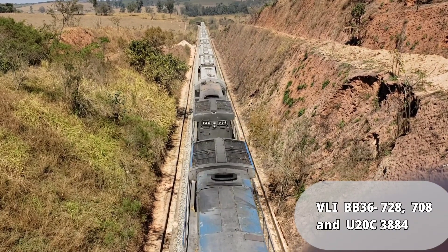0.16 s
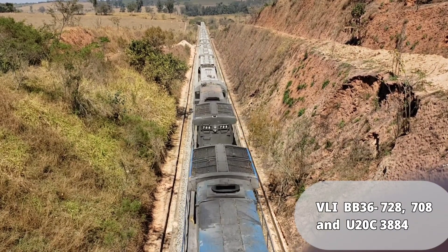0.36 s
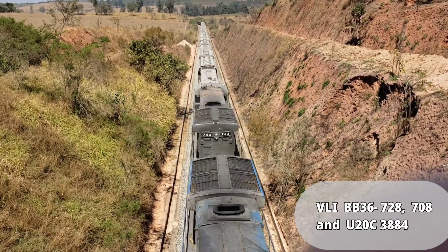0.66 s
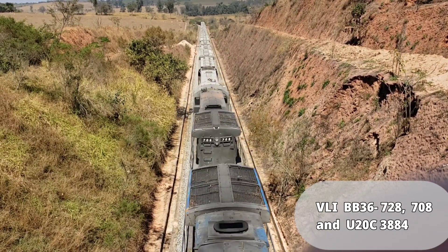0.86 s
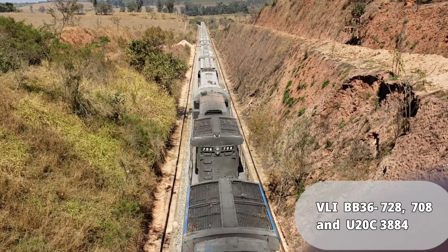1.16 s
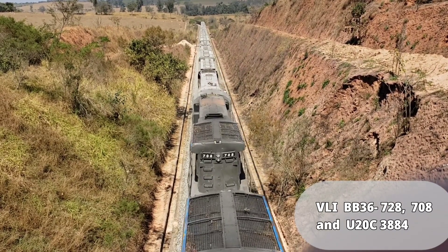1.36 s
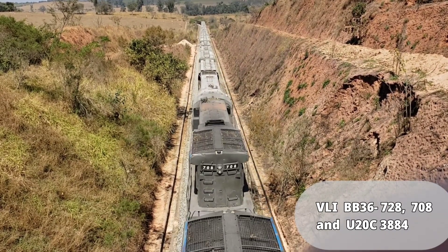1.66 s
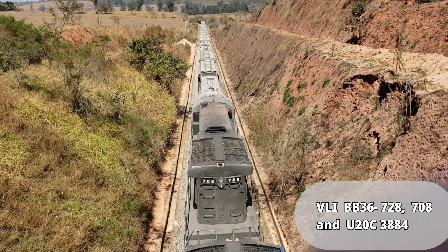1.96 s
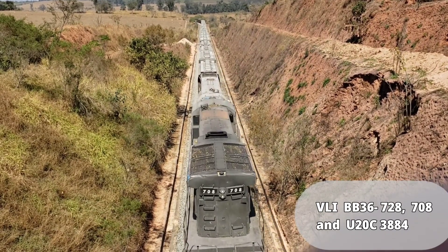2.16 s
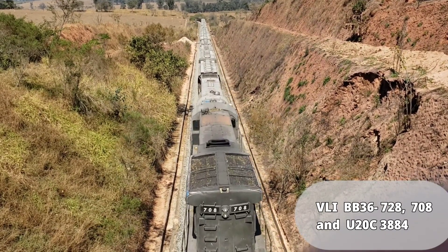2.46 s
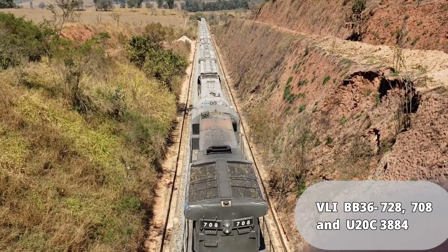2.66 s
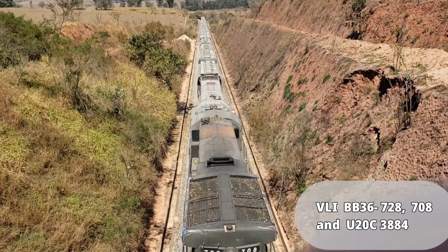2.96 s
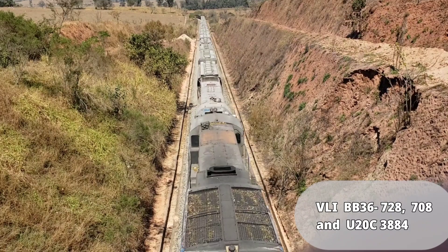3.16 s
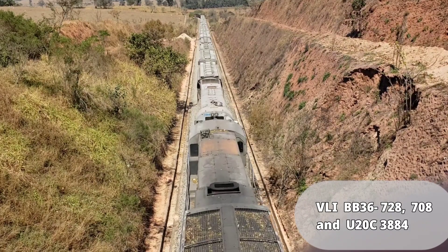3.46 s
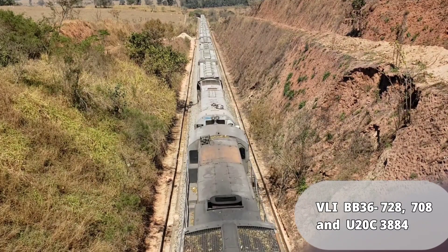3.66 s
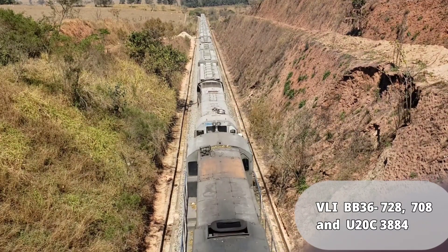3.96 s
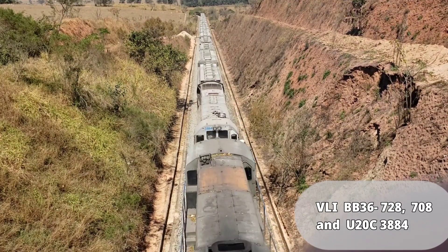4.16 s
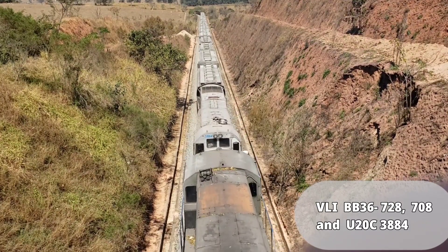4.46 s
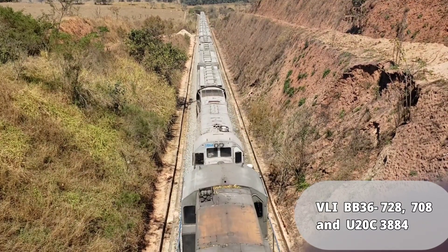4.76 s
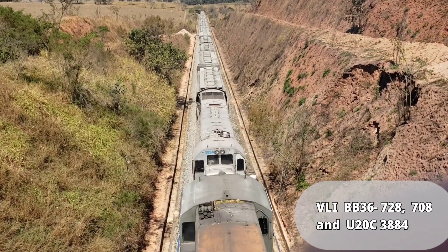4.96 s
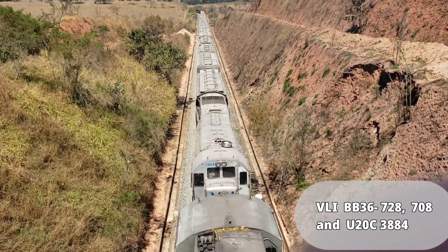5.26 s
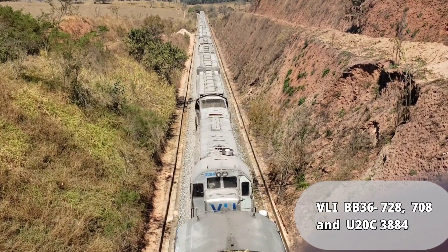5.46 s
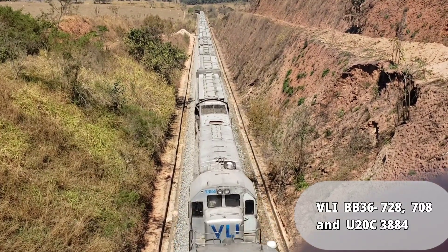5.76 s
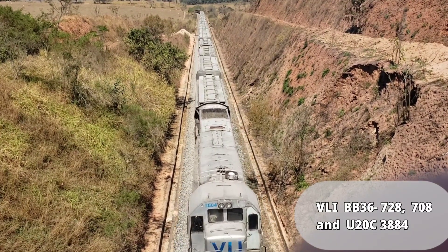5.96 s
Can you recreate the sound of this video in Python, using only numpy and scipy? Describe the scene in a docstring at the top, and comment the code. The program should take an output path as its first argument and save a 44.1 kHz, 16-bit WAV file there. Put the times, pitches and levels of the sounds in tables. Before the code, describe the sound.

Slow diesel locomotives pass close beneath, roaring exhaust hiss and heavy throbbing boom, then dropping to muffled engine drone, rolling rumble and faint rail squeals.

```python
"""Two diesel locomotives roll slowly under a bridge in a cutting, heard from above by a close pair of microphones.
First the near stack roars and puffs in bands of noise over the boom of the exhaust, itself firing harmonics
shaped by pipe resonances, with a whine from the traction gears. From about two seconds the deck hides the
stack and its hiss falls away; then the following engine's boom swells. From about four seconds wheels and
rails take over: shaped noise rumbles and hums, and narrow resonances sing briefly."""
import sys
import numpy as np
from scipy import signal
from scipy.fft import rfft, irfft
from scipy.io import wavfile
from scipy.ndimage import map_coordinates

SR = 44100
rng = np.random.default_rng(int(sys.argv[2]) if len(sys.argv) > 2 else 0)


def how_loud(loudness_db):
    """Turn decibels into a plain amplitude multiplier (0 dB gives 1, 20 dB gives 10)."""
    steps = np.asarray(loudness_db, float) / 20
    return 10 ** steps


def transcribe(u):
    """Save the signal u as a 16-bit wav file named by the first command-line argument.

    u: samples, shape (n,) or (channels, n), limited to [-1, 1]; the rate is SR.
    q: integer samples, one column per channel.
    """
    v = np.clip(np.atleast_2d(u).T, -1, 1)
    q = np.round(v * 32767).astype(np.int16)
    wavfile.write(sys.argv[1], SR, q)


N = 269010  # samples


def rms_one(x):
    """Scales a sound to rms 1."""
    return x / np.sqrt(np.mean(x ** 2) + 1e-20)


def in_time(rows):
    """Reads each column of a table as one value per sample."""
    s, *columns = np.transpose(rows)
    return [np.interp(np.arange(N) / SR, s, column) for column in columns]


def at_hz(points, hz):
    """Reads a spectrum table on a logarithmic frequency axis."""
    table_hz, values = np.array(points).T
    return np.interp(np.log(hz), np.log(table_hz), values)


def cut(x, hz, kind, order=2):
    """Butterworth filter run forwards."""
    return signal.sosfilt(signal.butter(order, hz, kind, fs=SR, output="sos"), x)


def cut_in_phase(x, hz, kind):
    """Gentle Butterworth filter run both ways, so that it adds no delay."""
    return signal.sosfiltfilt(signal.butter(1, hz, kind, fs=SR, output="sos"), x)


def drift(rate_hz):
    """Random wandering of spread 1: noise through two equal low-pass poles at rate_hz."""
    step = 40  # samples between the values drawn
    r = np.exp(-2 * np.pi * rate_hz * step / SR)
    noise = rng.standard_normal(N // step + 2002)
    slow = signal.lfilter([1], [1, -2 * r, r * r], noise)[2000:]
    return np.interp(np.arange(N) / step, np.arange(len(slow)), rms_one(slow - slow.mean()))


def late(x, ms):
    """Reads a sound with a changing delay."""
    return map_coordinates(x, [np.arange(N) - ms * SR / 1000], order=3, mode="mirror")


def resonances(x, modes):
    """Parallel ringing modes with alternating signs."""
    out = 0
    for k, (hz, width_hz, db) in enumerate(modes):
        r = np.exp(-np.pi * width_hz / SR)
        w = 2 * np.pi * hz / SR
        ring = signal.lfilter([0, np.sin(w)], [1, -2 * r * np.cos(w), r * r], x)
        out = out + (-1) ** k * how_loud(db) * ring
    return out


def coloured(spectrum, count):
    """Frequencies, and the transforms of unrelated noises shaped by a spectrum."""
    hz = np.maximum(np.fft.rfftfreq(N, 1 / SR), 1)
    return hz, rfft(rng.standard_normal((count, N))) * how_loud(at_hz(spectrum, hz))


# near engine: (time [s], order 11 level [dB], order 12 level [dB], order 13 level [dB],
# bark swing [dB], delay of a second arrival of the lower orders, which shapes the throb [ms])
NEAR_ENGINE = [(0, -27, -18, -19.5, -0.5, 54), (.5, -21, -19, -22, -0.5, 57), (1, -27, -23, -18.5, 1, 57),
               (1.3, -31, -23, -13.5, -2, 55.5), (1.55, -22, -22.5, -17, 0.5, 55.7),
               (2, -24, -22.5, -16, -3.5, 55), (2.5, -16, -22.5, -17, -4, 55.5),
               (3, -19, -19.5, -17, -13, 55.3), (3.25, -20, -24, -17.5, -15, 55.3),
               (3.5, -32, -20, -42, -9, 54.7), (3.75, -58, -22.5, -30.5, -14.5, 54.7),
               (4, -32, -33, -21, -14, 54.7), (4.3, -28, -26.5, -26, -16, 55.8),
               (4.75, -21.5, -55, -24, -18.5, 56.5), (5, -35, -22.5, -30, -17, 58),
               (5.25, -22.5, -20, -15.5, -12, 57), (5.5, -23, -19.5, -22, -15.5, 46),
               (5.75, -20, -50, -20.5, -18.5, 56.3), (6.1, -21, -23, -31, -10.5, 56)]
# orders of the engine cycle that sound together: (first [order], last [order]); the first three are the boom
ORDER_GROUPS = [(11, 11), (12, 12), (13, 13), (5, 7), (8, 10), (14, 15), (16, 18), (19, 23), (24, 26),
                (27, 29), (30, 44)]
# each group beside the boom: (level [dB], share of the bark's swing [ratio])
BARK_VOICING = [(-37, 0.091), (-31.5, 0.27), (-23, 0.59), (-24.5, 0.98), (-22, 1.16), (-35, 1.05),
                (-35.5, 0.96), (-33.5, 1.03)]
# following engine: (time [s], level [dB])
FOLLOWING_ENGINE = [(2.5, -64), (3.7, -42), (4.4, -30), (5.2, -29.5), (6.1, -32)]


def exhausts(near_hz, far_hz):
    """Exhaust boom and bark of both engines; the near one's lower orders arrive twice, shaping the throb."""
    second_share = 0.26
    near = orders(near_hz, start=0, waver_db=1.0)
    far = orders(far_hz, start=.3, waver_db=3.5)
    *boom_db, bark_db, second_ms = in_time(NEAR_ENGINE)
    groups = [rms_one(near[first:last + 1].sum(0)) for first, last in ORDER_GROUPS]
    groups.append(rms_one(far[5:].sum(0)))
    voiced_db = [db + swing * bark_db for db, swing in BARK_VOICING]
    levels = boom_db + voiced_db + in_time(FOLLOWING_ENGINE)
    parts = [how_loud(db) * signal.resample_poly(group, 20, 1)[:N] for db, group in zip(levels, groups)]
    lower_orders = sum(parts[:5])
    return sum(parts) + second_share * late(lower_orders, second_ms)


# cylinder firings in one engine cycle: (position [share of the cycle], relative strength [dB])
CYLINDER_FIRINGS = [(0.047, 4.5), (0.098, 7.9), (0.135, -1.2), (0.236, -12.0), (0.281, 9.2), (0.344, 9.8),
                    (0.413, 8.4), (0.472, -1.4), (0.585, 2.7), (0.604, -3.1), (0.669, 3.5), (0.741, 10.7),
                    (0.794, 2.5), (0.809, -0.4), (0.934, 3.7), (0.986, 4.4)]
# resonances of exhaust pipe and silencer: (frequency [Hz], width [Hz], relative gain [dB])
EXHAUST_PIPE = [(85.0, 15.0, -6.7), (95.0, 17.8, -5.9), (128.4, 12.0, -25.3), (200.0, 90.0, -10.0),
                (221.1, 43.1, -17.3)]


def orders(cycle_hz, start, waver_db):
    """Each order of the cycle, at SR / 20: the firing pulses' harmonic as the pipe passes it, wavering slowly."""
    order = np.arange(45)
    share, db = np.transpose(CYLINDER_FIRINGS)
    pulses = how_loud(db) @ np.exp(-2j * np.pi * np.outer(share, order))
    click = np.r_[1., np.zeros(SR - 1)]
    response = rfft(resonances(click, EXHAUST_PIPE))
    pipe = response[np.round(order * cycle_hz[0]).astype(int)]  # bins are 1 Hz apart
    turns = (np.cumsum(cycle_hz) / SR + start)[::20]
    waver = np.array([drift(3)[::20] for _ in order])
    harmonics = (pulses * pipe)[:, None] * np.exp(2j * np.pi * np.outer(order, turns))
    return np.real(harmonics) * how_loud(waver_db * waver)


# the right treble against the left: (time [s], turn of its phase [rad], share of the ridge on both sides [ratio])
TREBLE_TURN = [(0, 0.42, 0.81), (.9, 0.15, 1.0), (1.3, 1.24, 1), (1.7, 1.06, 0.086), (2, 2.8, 0.13),
               (2.25, 3.4, 0.25)]
# echo off the parapet: (time [s], delay [ms])
PARAPET_ECHO = [(0, .28), (.9, .254), (1.2, .232), (1.6, .213), (2.1, .19), (3.3, .18)]
# narrow ridge in the jet's hiss: (frequency [Hz], width [Hz], resonator gain [dB])
HISS_RIDGE = [(4220, 260, -19)]


def stack(turns):
    """The gas reaches each microphone directly, by an inverted parapet echo and scattered off the banks."""
    gas = turbulent_gas(turns)
    turn, ridged = in_time(TREBLE_TURN)
    direct = gas[0] + ridged * resonances(np.gradient(gas[0]), HISS_RIDGE)
    echo = late(direct, *in_time(PARAPET_ECHO))
    echo = cut_in_phase(echo, [500, 14000], "band")  # its lows and top are lost
    left = direct - 0.18 * echo
    right = direct - 1.18 * echo
    # the right treble turns in phase against the left
    hz = np.maximum(np.fft.rfftfreq(N, 1 / SR), 1)
    treble = irfft(rfft(right) / (1 + (3380 / hz) ** 12) / (1 + (hz / 16000) ** 8), N)
    turned = np.real(signal.hilbert(treble) * np.exp(-1j * turn))
    pair = np.array([left, right - treble + turned]) * how_loud([[-1], [-5]])
    lows = gas[0] - cut_in_phase(gas[0], 700, "high")
    right_lows = lows * [[0], [.4]]  # fills up the lows on the quieter right
    # the banks return unlike sound to each side
    scattered = cut(gas[1:], 7600, "high", order=1)
    scattered = scattered + how_loud(-5.5) * cut(gas[1:], 12200, "high", order=4)
    return pair + right_lows + scattered


# near stack, sinking behind the deck: (time [s], jet level [dB], casing roar level [dB], low rush level [dB],
# throb per cycle [dB], top fizz level [dB], share of the puffs heard [ratio])
NEAR_STACK = [(0, -36, -35, -35.5, -1.5, -38.5, 0.98), (.6, -33, -30, -32, 0, -38, 0.99),
              (.95, -29.5, -25.5, -31.5, -0.5, -34.5, 0.92), (1.6, -28.5, -28, -28.5, 0, -33, 0.85),
              (1.95, -30, -34, -27, -0.5, -29.5, 0.75), (2.05, -35, -30, -28.5, -3, -34, 0.74),
              (2.15, -40.5, -46, -28.5, 3, -36, 0.96), (2.35, -48, -53, -30, -2, -43.5, 1),
              (2.6, -51, -56, -31.5, 2, -48, 0.79), (2.8, -53, -51.5, -37, -2.5, -53, .4),
              (2.95, -78, -78, -41.5, 2, -74, 0.49), (4.0, -90, -90, -53, -7, -85, 0.37)]
# roar's upper edge, near 3 kHz, as the stack comes under the deck: (time [s], level [dB])
ROAR_EDGE = [(0, -36), (.8, -45), (1.3, -42), (1.9, -36), (2.15, -43), (2.4, -41), (2.7, -50.5),
             (2.95, -75)]
# puffs in each cycle, before each band's depth: (centre [share of the cycle], spread [share], rise [dB])
JET_PUFFS = [(.21, 0.059, 7), (.44, 0.029, 7), (.6, 0.26, 5)]
# brief surges and dips in the roar: (centre time [s], level change [dB], spread [s])
ROAR_SURGES = [(0.913, 8.5, 0.0032), (1.05, 5, 0.0044), (2.131, 8.5, 0.0066), (2.255, 14, 0.012),
               (2.347, 11, 0.012), (2.418, -15, .008), (2.517, 10, .014), (2.606, -4, 0.011)]
# colour of the gas within each band: (frequency [Hz], relative density [dB per Hz])
GAS_COLOUR = [(180, -1.5), (345, -4.5), (450, -12.5), (535, -7), (560, -2.5), (590, -6.5), (670, -3.5),
              (740, -6.5), (880, -13), (1200, -9), (1450, -15.5), (1700, -8), (1850, -10), (2000, -5),
              (2250, -1.5), (2450, -3.5), (2650, 0.5), (2820, -8), (3600, -6), (4300, -9.5), (6000, -15.5),
              (9000, -23), (11000, -18.5), (14300, -21), (15500, -19.5)]


def turbulent_gas(turns):
    """Three unrelated gas noises, each in five bands that puff and flutter to different depths."""
    jet_db, roar_db, rush_db, throb_db, fizz_db, puffing = in_time(NEAR_STACK)
    edge_db, = in_time(ROAR_EDGE)
    throb_db = throb_db * np.cos(2 * np.pi * (turns - .4))
    puff_db = 0
    for share, width, db in JET_PUFFS:
        from_centre = (turns - share + .5) % 1 - .5
        uneven = 1 + 0.45 * np.tanh(drift(6))
        puff_db = puff_db + db * np.exp(-.5 * (from_centre / width) ** 2) * uneven
    flutter_db = 1.0 * drift(96) + 1.1 * drift(420)
    swing_db = puffing * (puff_db - puff_db.mean()) + flutter_db
    t = np.arange(N) / SR
    surge_db = sum(db * np.exp(-.5 * ((t - s) / spread) ** 2) for s, db, spread in ROAR_SURGES)
    bands = [  # low edge Hz, high edge Hz, level dB, share of the swing
        (198, 1530, rush_db + throb_db, 0.54),
        (1340, 2500, roar_db + throb_db + surge_db, 0.4),
        (2870, 3450, edge_db + throb_db + 0.52 * surge_db, 0.9),
        (4200, 8000, jet_db + 0.17 * throb_db, 0.89),
        (7700, 15900, fizz_db, 0.82)]
    hz, noise = coloured(GAS_COLOUR, count=3)
    out = 0
    for low, high, db, depth in bands:
        skirts = np.sqrt((1 + (low / hz) ** 12) * (1 + (hz / high) ** 12))
        out = out + rms_one(irfft(noise / skirts, N)) * how_loud(depth * swing_db + db)
    return out


# traction gear whine, about which pitch and level wander: (time [s], frequency [Hz], level [dB])
GEAR_WHINE = [(0, 244, -35.5), (.5, 244.5, -27), (1.2, 245.5, -27), (2, 247, -29), (2.8, 248.5, -33),
              (3.6, 249, -45), (4.3, 251, -52), (5.1, 254, -45.5), (6.1, 257, -37.5)]


def gear_whine():
    """Meshing teeth sound a wandering tone and a second, broken whine at one and a half times its pitch."""
    hz, db = in_time(GEAR_WHINE)
    mesh = 2 * np.pi * np.cumsum(hz + 1.0 * drift(2.55)) / SR
    lower = how_loud(db + 2.27 * drift(7.0)) * np.sin(mesh)
    upper_db = -25.5 + 0.608 * db  # follows only part of the lower whine's level
    upper = how_loud(upper_db + 1.95 * drift(9.7)) * np.sin(1.5 * mesh)
    return np.sqrt(2) * (lower + upper)


# rolling train: (time [s], rumble level in the treble [dB], rail hum level [dB])
ROLLING_TRAIN = [(0, -41, -39), (2.9, -47.5, -81), (3.2, -48.5, -55), (3.6, -49.5, -58), (4.15, -49.5, -55),
                 (4.35, -47, -48), (5.1, -46.5, -45.5), (5.4, -47, -44.5), (5.7, -46, -50.5),
                 (6.1, -46, -45)]
# colour of the rumble: (frequency [Hz], relative density [dB per Hz])
RUMBLE_COLOUR = [(25, -8), (45, -23.5), (110, -11.5), (200, -21.5), (370, -32), (460, -43), (570, -37),
                 (1000, -47), (1700, -43), (2600, -45), (3100, -47.5), (7800, -52.5), (8800, -57.5),
                 (15800, -60.5)]
# how alike the rumble is left and right: (frequency [Hz], correlation [ratio])
RUMBLE_LIKENESS = [(60, 0.96), (180, 0.85), (550, 0.78), (1650, 0.19), (2600, 0.034), (3300, -0.035),
                   (15000, -0.038)]
# bands of the rail hum: (frequency [Hz], width [Hz], relative level [dB])
RAIL_BANDS = [(551, 41, -22), (2370, 1500, 1)]


def rolling():
    """Broad rumble of wheels and bogies as shaped noise, and the rails humming in a few bands."""
    rumble_db, hum_db = in_time(ROLLING_TRAIN)
    hz, (mid, side) = coloured(RUMBLE_COLOUR, count=2)
    alike = np.clip(at_hz(RUMBLE_LIKENESS, hz), -1, 1)
    rumble = irfft(np.sqrt(1 + alike) * mid + np.sqrt(1 - alike) * side * [[1], [-1]], N)
    rumble = rumble / np.std(cut(rumble, [3000, 9000], "band")) * how_loud(0.96 * drift(19.4))
    common, *apart = rng.standard_normal((3, N))
    source = common + 0.69 * np.array(apart)
    hum = 0
    for mode in RAIL_BANDS:
        band = rms_one(resonances(resonances(source, [mode]), [mode]))
        hum = hum + band * how_loud(mode[2] + 0.88 * drift(27.0))
    return how_loud(rumble_db) * rumble + how_loud(hum_db) * hum


# the rails sing out briefly under passing wheels:
# (peak time [s], length as twice the spread [s], frequency [Hz], peak level [dB])
RAIL_SONGS = [(4.012, 0.077, 1270, -48), (4.443, 0.27, 1680, -46.5), (4.75, 0.52, 1284, -55),
              (5.012, 0.1, 1230, -50), (5.097, 0.1, 1716, -43), (5.233, .12, 1260, -47),
              (5.398, 0.084, 1304, -43.5), (5.414, 0.058, 1690, -51), (5.566, 0.093, 1290, -50),
              (5.954, 0.3, 1290, -50), (6.024, 0.24, 1690, -48.5)]


def singing():
    """Noise in a narrow resonance swells and fades, its level flickering at random."""
    t = np.arange(N) / SR
    common, *apart = rng.standard_normal((3, N))
    source = common + .5 * np.array(apart)
    out = 0
    for s, length, hz, db in RAIL_SONGS:
        mode = [(hz, 70, 0)]  # 70 Hz wide
        tone = rms_one(resonances(resonances(source, mode), mode))
        swell = np.exp(-.5 * (2 * (t - s) / length) ** 2)
        out = out + how_loud(db + 1.5 * drift(33)) * tone * swell
    return out


# engine cycles heard per second, falling as each stack passes:
# (time [s], near engine [Hz], following engine [Hz])
ENGINE_CYCLES = [(0, 9, 8.96), (.7, 8.975, 8.96), (1.4, 8.972, 8.96), (2, 8.947, 8.96), (2.6, 8.881, 8.96),
                 (3.2, 8.77, 8.96), (4, 8.74, 8.96), (4.7, 8.78, 8.95), (6.1, 8.76, 8.93)]
# the left microphone hears the engines later while the stack is below: (time [s], delay [ms])
LEFT_DELAY = [(0, 0), (1, 0.0054), (2.3, 0.063), (3.3, 0.083), (4.5, 0.029)]


def scene():
    """Engines and gears in the middle, a little louder on the left, with stack and rolling train around them."""
    near_hz, far_hz = in_time(ENGINE_CYCLES)
    engines = exhausts(near_hz, far_hz) + gear_whine()
    tilt_db = 0.82
    left = how_loud(tilt_db) * late(engines, *in_time(LEFT_DELAY))
    right = how_loud(-tilt_db) * engines
    turns = np.cumsum(near_hz) / SR
    return np.array([left, right]) + stack(turns) + rolling() + singing()


def roll_off(x):
    """The treble ends steeply here."""
    return signal.sosfilt(signal.butter(12, 16080, fs=SR, output="sos"), x)


def record(dry):
    """Peaks are rounded slightly, then both ends of the range are cut."""
    rounded = 1.44 * np.tanh(dry / 1.49)
    heard = cut(rounded, 41, "high", order=6)
    heard = cut(heard, 15640, "low", order=60)
    return roll_off(heard)


dry = scene()
out = record(dry)
transcribe(out)
```